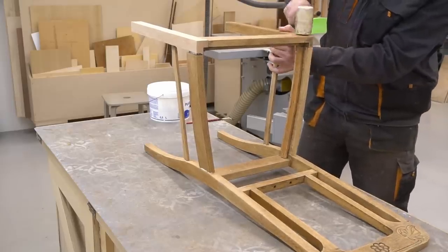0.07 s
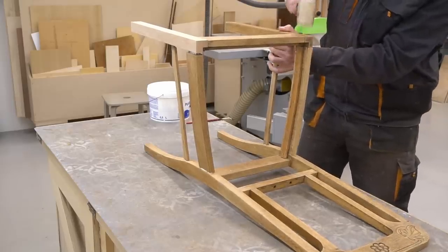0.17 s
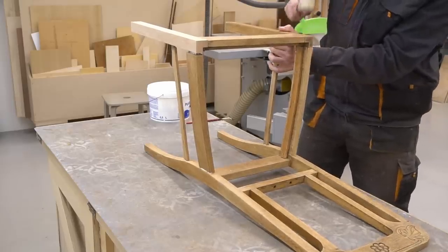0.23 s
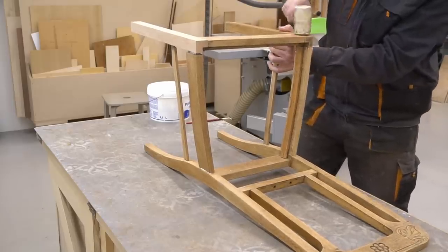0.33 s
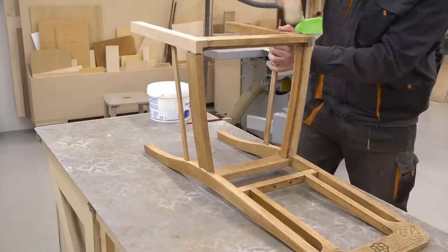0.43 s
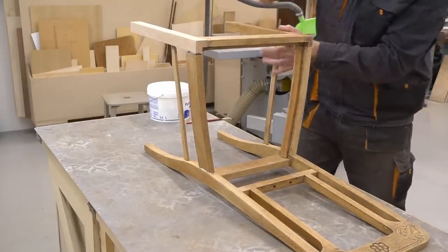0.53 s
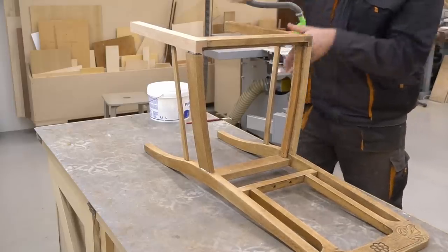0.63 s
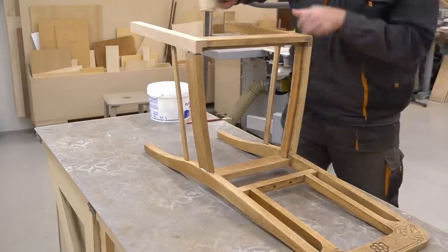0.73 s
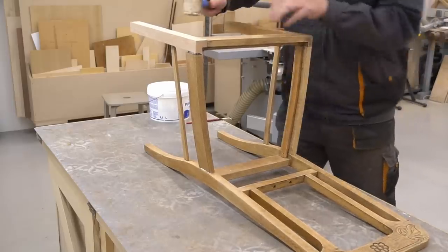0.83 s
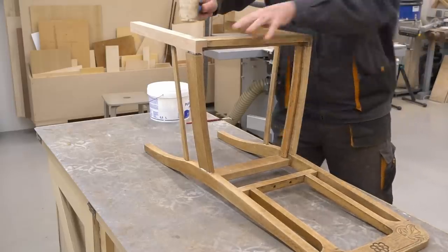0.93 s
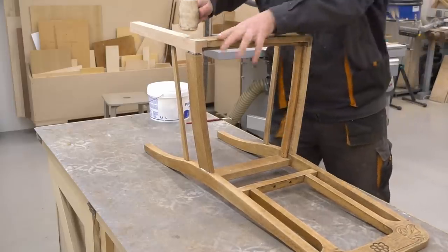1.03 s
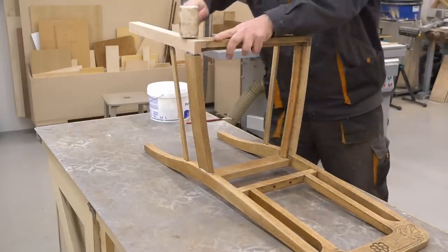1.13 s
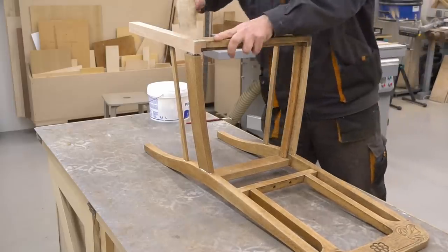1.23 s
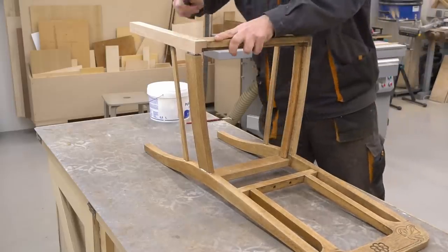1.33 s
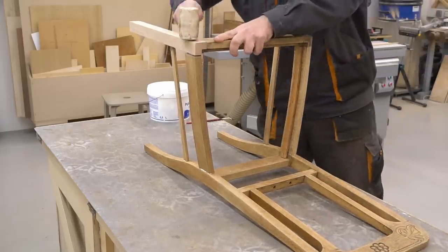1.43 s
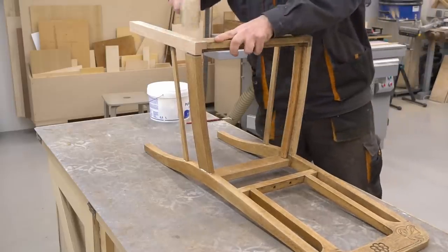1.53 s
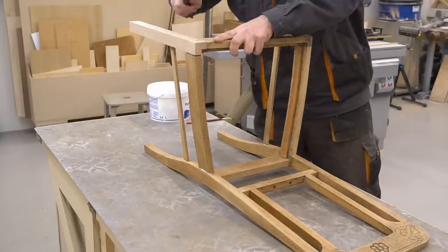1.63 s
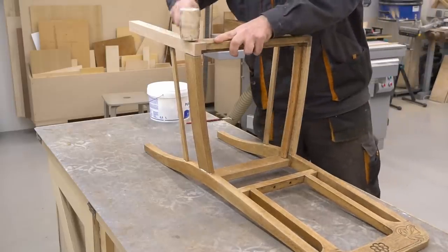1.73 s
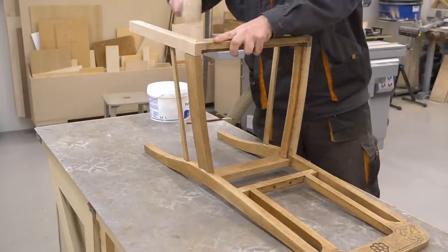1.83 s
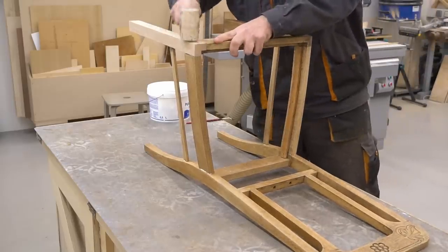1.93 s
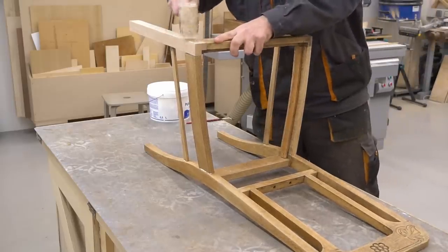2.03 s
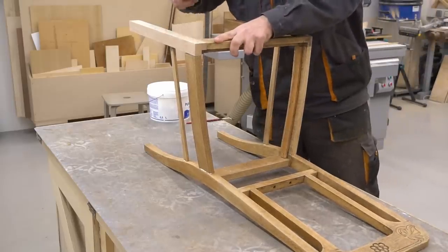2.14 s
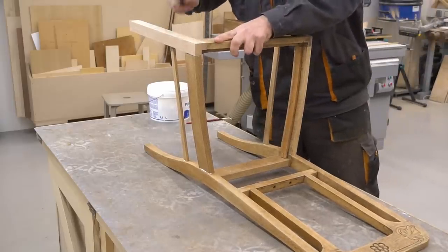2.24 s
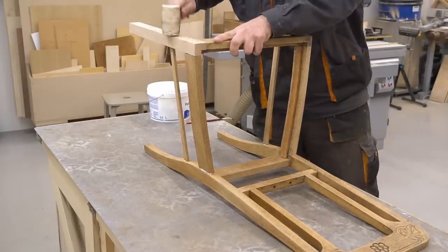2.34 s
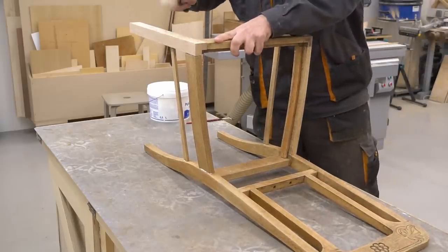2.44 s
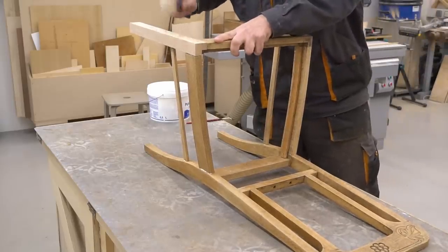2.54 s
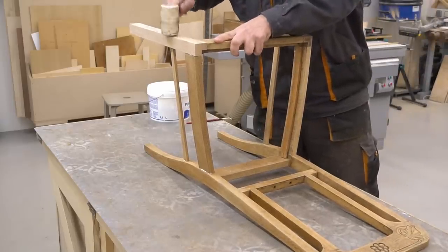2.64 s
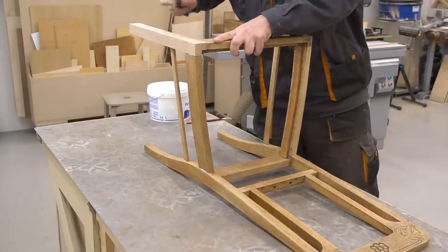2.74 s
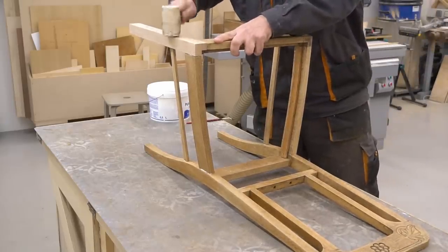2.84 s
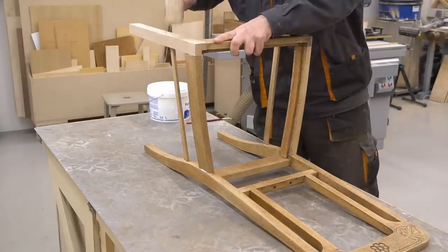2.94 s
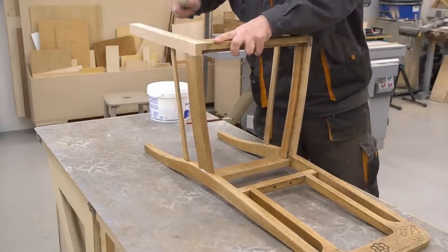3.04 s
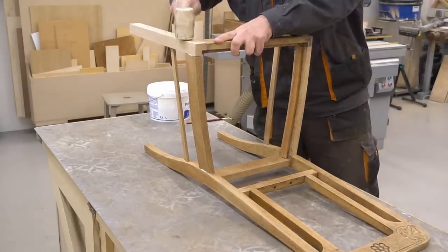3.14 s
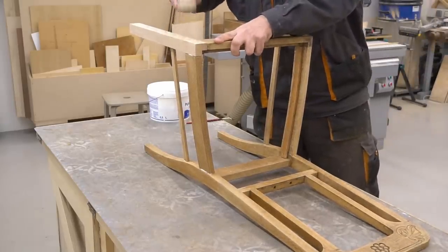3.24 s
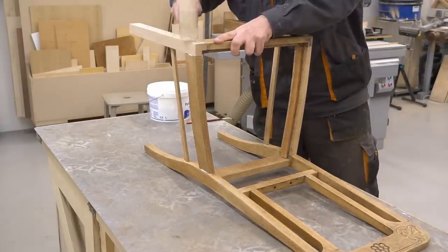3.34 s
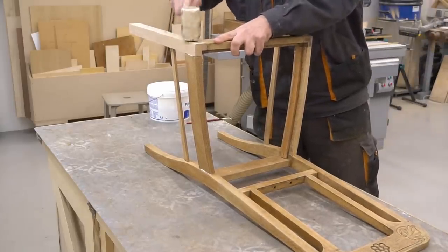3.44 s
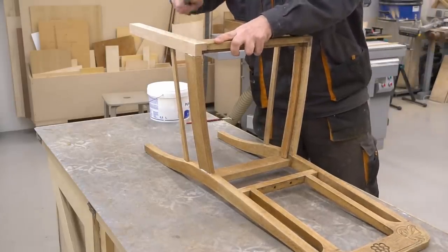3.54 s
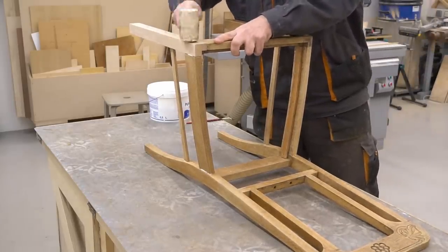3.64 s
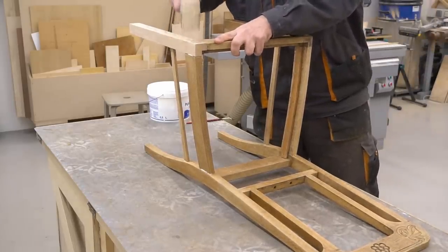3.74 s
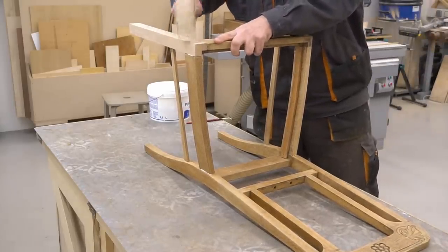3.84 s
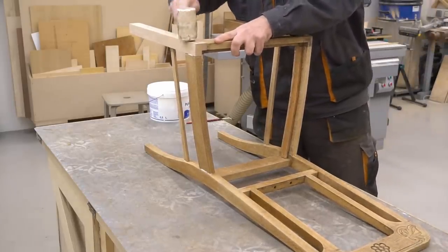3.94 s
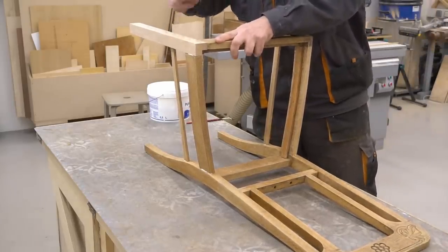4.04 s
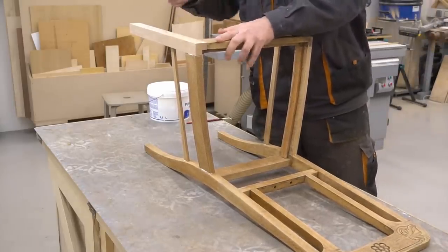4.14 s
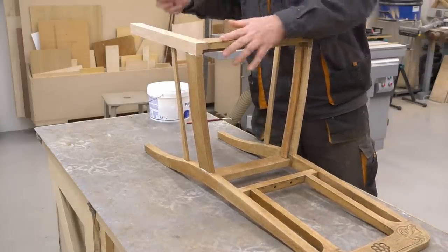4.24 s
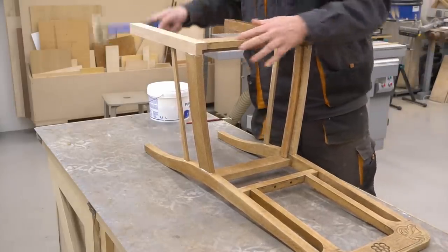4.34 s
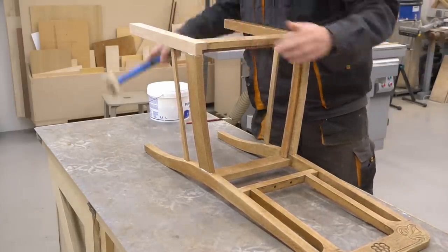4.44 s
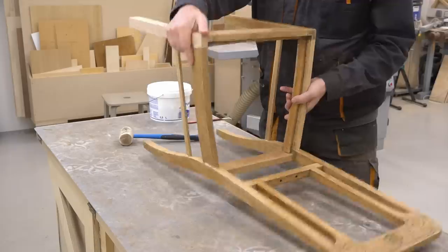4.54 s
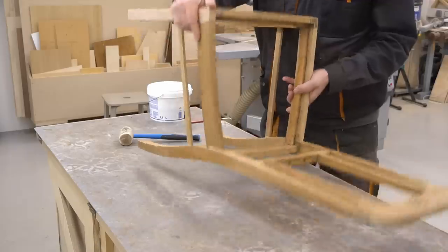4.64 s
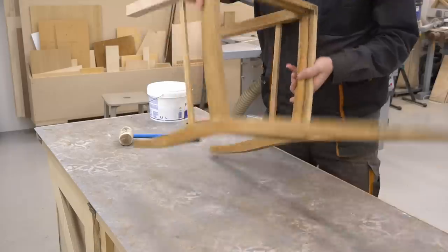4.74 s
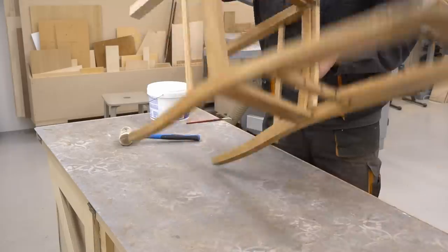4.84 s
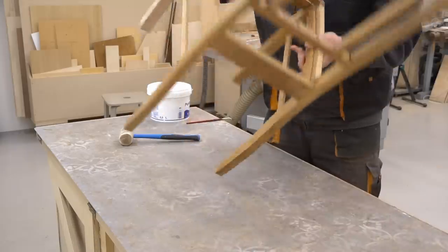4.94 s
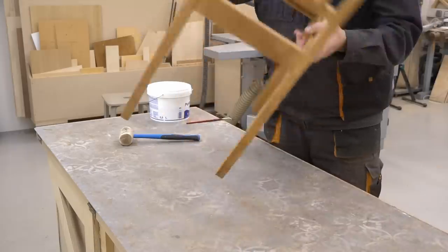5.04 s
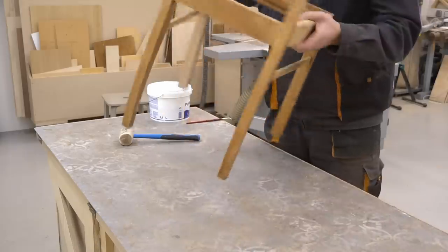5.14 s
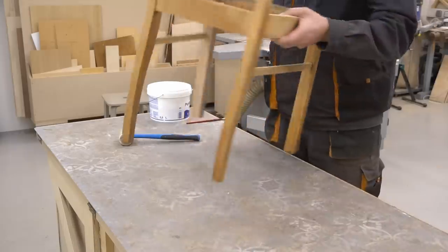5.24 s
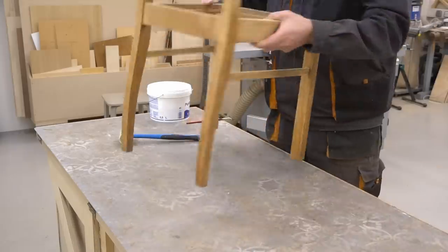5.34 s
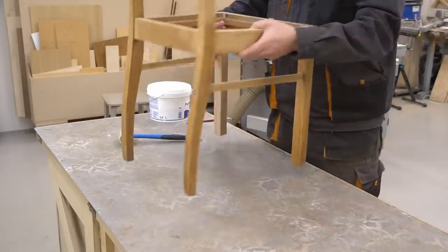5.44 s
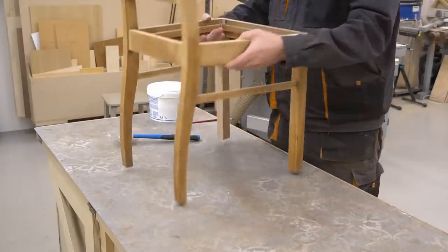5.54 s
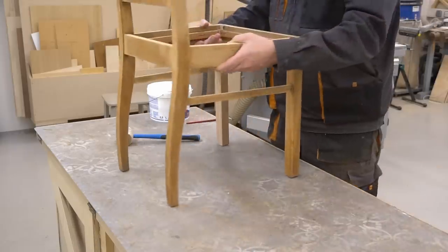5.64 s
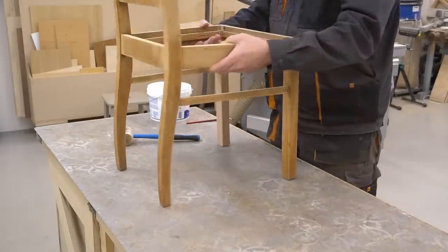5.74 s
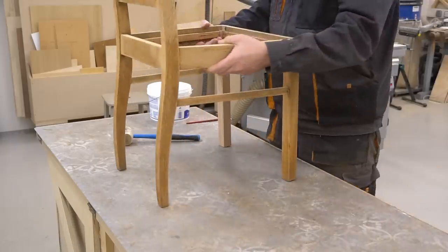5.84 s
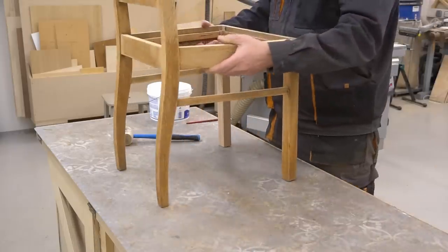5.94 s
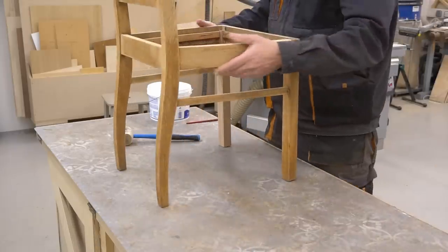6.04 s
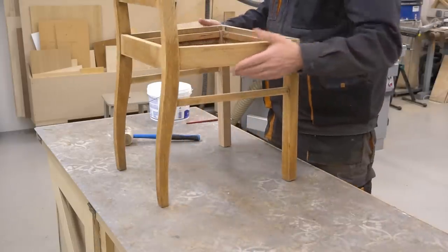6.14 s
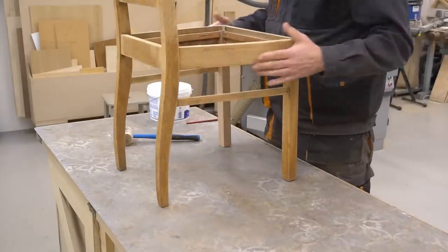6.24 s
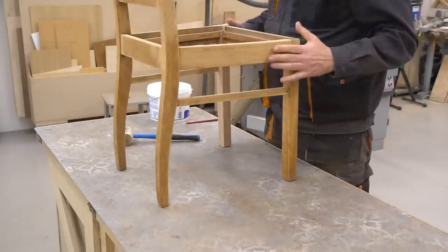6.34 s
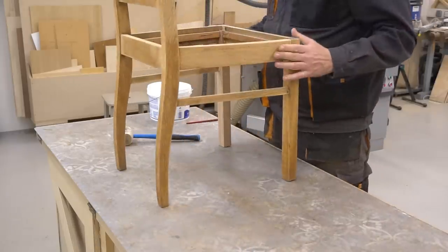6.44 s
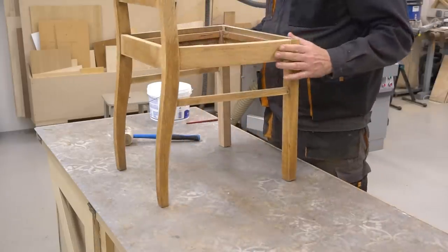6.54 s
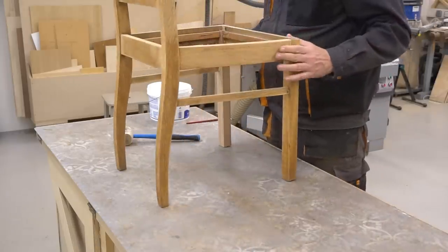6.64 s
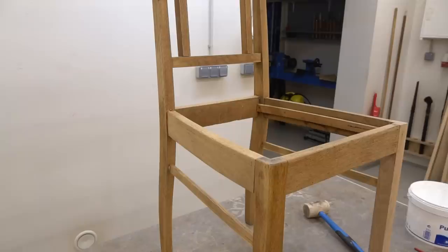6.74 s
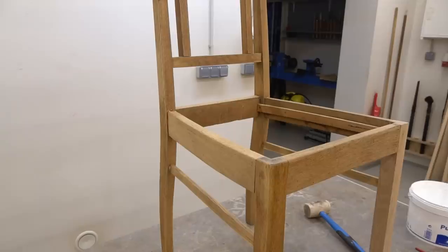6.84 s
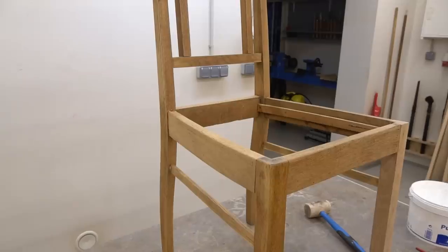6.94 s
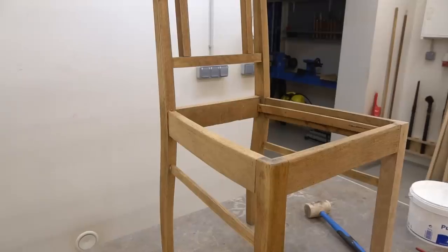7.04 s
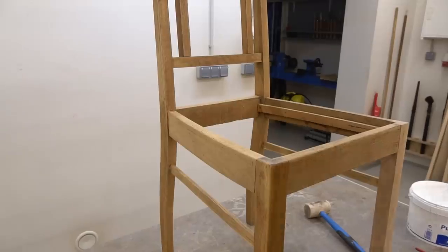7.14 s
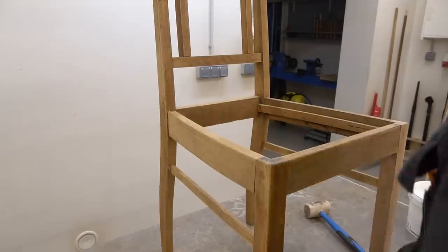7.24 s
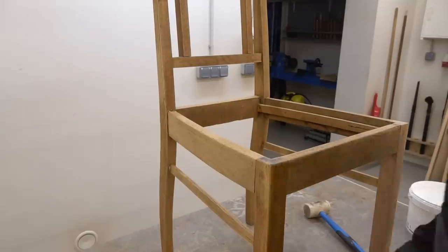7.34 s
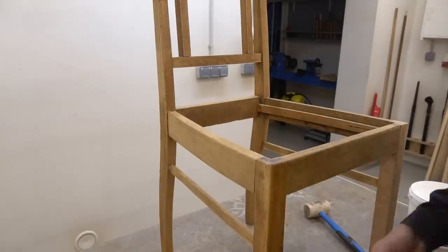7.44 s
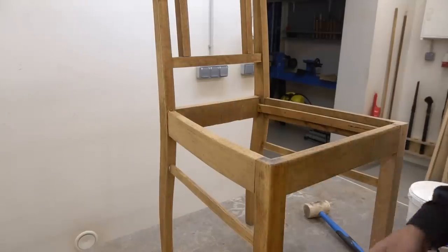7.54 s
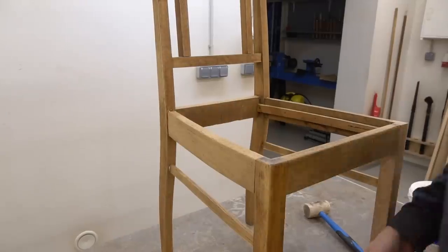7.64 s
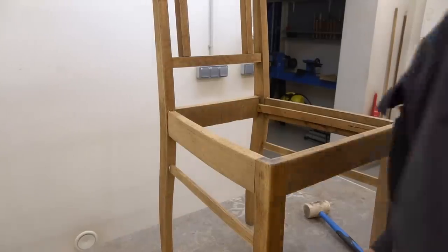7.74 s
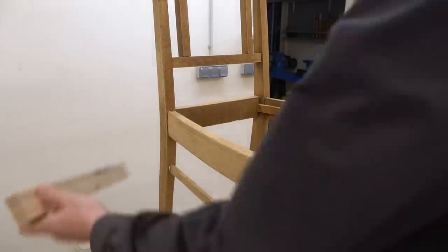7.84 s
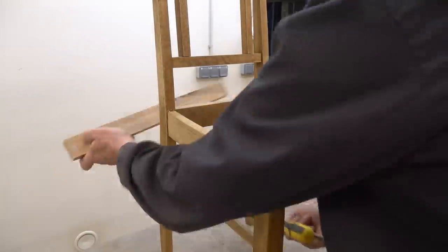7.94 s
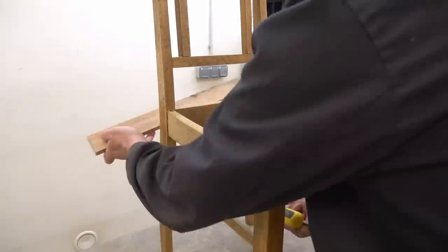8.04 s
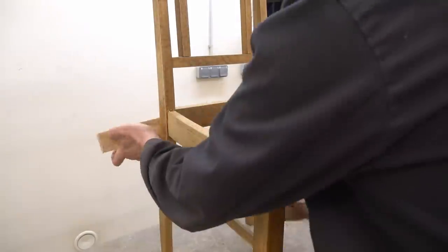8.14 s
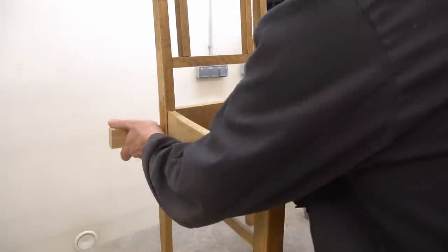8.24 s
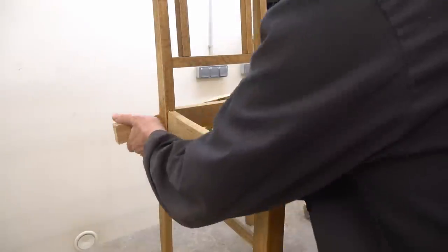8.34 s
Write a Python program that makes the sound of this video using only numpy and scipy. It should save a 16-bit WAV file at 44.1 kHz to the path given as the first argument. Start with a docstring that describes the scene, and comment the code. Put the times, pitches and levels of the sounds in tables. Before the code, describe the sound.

Sharp wood-on-wood blows ring through a chair frame and wash around a hard room: a quick opening burst, a gap with one light touch, then a regular run about four per second, ending full and bright. Afterwards come a soft mallet set-down, quiet handling, clustered leg thuds, a hand rub, cloth rustle, gritty metallic scraping and a closing double wooden clack. Wide stereo, over very quiet room air.

```python
"""A wooden mallet drives home the joints of a chair frame lying on a bench in an echoing workshop.
Each blow is a crack of noise, then ringing chair modes and a wash of room noise in stereo.
The mallet is put down, the chair is stood on its legs and hands slide over the wood: coloured knocks and
swelling noise. Then sleeves rustle, a small metal tool is scraped up (gritty noise through resonances)
and a batten is knocked against the chair, all over the still air of the shop."""
import sys
import numpy as np
from scipy import signal
from scipy.fft import rfft, irfft, next_fast_len
from scipy.io import wavfile
from scipy.ndimage import uniform_filter1d

SR = 44100
rng = np.random.default_rng(int(sys.argv[2]) if len(sys.argv) > 2 else 0)


def transcribe(u):
    """Save the signal u as a 16-bit wav file named by the first command-line argument.

    u: samples, shape (n,) or (channels, n), limited to [-1, 1]; the rate is SR.
    q: integer samples, one column per channel.
    """
    v = np.clip(np.atleast_2d(u).T, -1, 1)
    q = np.round(v * 32767).astype(np.int16)
    wavfile.write(sys.argv[1], SR, q)


N = 369979
RING_SIZE = SR * 4 // 5   # samples that one knock lasts
AGE = np.arange(RING_SIZE) / SR   # seconds since a knock began
TIME = np.arange(N) / SR   # seconds since the scene began

# the workshop's reverberation in each band: pitch_hz, t60_s
ROOM_T60 = [(100, 0.5), (300, 0.57), (1000, 0.59), (2200, 0.55), (4500, 0.51), (10000, 0.39)]
# how alike left and right microphones hear the sound: pitch_hz, likeness (0-1)
LEFT_RIGHT_LIKENESS = [(100, 1), (350, 0.97), (700, 0.82), (1400, 0.59), (2800, 0.45), (5500, 0.19),
                       (9000, 0.42)]
# still workshop: pitch_hz, relative_db
AIR_COLOUR = [(18, -60), (30, -45.5), (93, -16.5), (264, -31), (291, -14), (466, -17.5), (540, -18.5),
              (596, -14), (1490, -2.5), (1680, -9.5), (11000, -23.5), (14300, -62.5), (22000, -120)]

# mallet blows: start_s, level_db, seated (how firmly the joint is seated, 0-1), treble_db
BLOWS = [(-0.1, -29, 0.51, -5.5), (0.107, -29, 0.56, -1.5), (0.3164, -28.5, 0.51, -1.5),
         (1.4595, -28, 0.04, -6), (1.7446, -28, 0.2, -4), (1.9839, -31, 0.54, -1.5),
         (2.321, -30.5, 0.47, -2), (2.6066, -30, 0.49, -3), (2.8544, -31, 0.73, -2.5),
         (3.1262, -29, 0.49, -4.5), (3.392, -29, 0.58, 0), (3.6577, -29.5, 0.92, 7),
         (3.8938, -31.5, 0.99, 6)]
# where bass, low-mid, the neutral middle and treble of a blow lie: pitch_hz
BLOW_COLOUR_HZ = [300, 750, 1600, 3600]
# the dense ringing of frame and bench: pitch_hz, relative_db
FRAME_COLOUR = [(30, -34), (60, -40), (90, -27), (140, -19), (280, -16.5), (400, -8.5), (560, -9.5),
                (850, -3), (1350, -2.5), (2100, -7.5), (4200, -12.5), (7000, -20.5), (11000, -30)]
# the crack of wood on wood: pitch_hz, relative_db
CRACK_COLOUR = [(40, -51.5), (150, -62), (420, -10.5), (800, -7.5), (1200, -4), (2200, -8), (3600, -9),
                (6000, -16), (11000, -27.5)]
# the clearest modes of the chair: pitch_hz, relative_db
FRAME_MODES = [(136, -57.5), (390, -67.5), (420, -53.5), (506, -65), (524, -62.5), (674, -53.5),
               (708, -60.5), (734, -53.5), (878, -54), (902, -47.5), (935, -59), (1003, -54.5),
               (1034, -56.5), (1133, -55.5), (1243, -57), (1333, -47.5), (1374, -56), (1399, -53),
               (1539, -53), (1553, -68), (1683, -55.5), (1949, -53.5)]
# resonances that come out as the joint closes: pitch_hz, width_hz, relative_db
JOINT_MODES = [(409.5, 10, 5), (910, 81, -7), (1368, 67, -0.5)]

# strokes of hands and sleeves: middle_s, level_db, half_length_s, treble_db
STROKES = [(0.964, -77.5, 0.051, -11), (1.085, -78, 0.015, 11), (4.327, -78.5, 0.08, 10),
           (4.8, -66, 0.12, -8), (5.0, -67.5, 0.051, -5), (5.185, -67.5, 0.12, -7.5), (5.5, -76.5, .13, -8),
           (5.956, -49.5, 0.098, -7), (6.19, -64, 0.16, -13.5), (6.428, -59.5, 0.058, 0.5),
           (6.55, -71, 0.091, 12), (6.762, -68, 0.11, 9.5), (6.902, -49.5, 0.014, -4.5),
           (6.968, -60.5, 0.064, -16.5), (7.138, -58, 0.023, 1), (7.237, -61, 0.043, 2),
           (7.333, -45, 0.039, 0), (7.536, -50, 0.03, -3), (7.675, -46.5, 0.018, 2.5),
           (7.767, -61, 0.02, 1), (7.883, -65, 0.071, -4), (7.959, -50.5, 0.012, 2),
           (8.205, -56.5, 0.022, -26), (8.289, -44.5, 0.02, -12.5)]
# skin and cloth on wood: pitch_hz, relative_db
RUB_COLOUR = [(60, -51), (250, -26.5), (600, -11.5), (1500, -2), (3500, 1.5), (7000, -2.5), (11000, -10)]

# the mallet resting lightly on the rail to take aim: start_s, level_db
AIM_TOUCHES = [(1.129, -50)]
# resonances of the rail: pitch_hz, width_hz, relative_db
AIM_MODES = [(143, 7.3, -1), (413, 26, -4.5), (890, 93, -13.5), (1420, 33, -0.5), (1705, 56, 0),
             (4300, 59, -11), (5910, 140, -20.5)]
# the knock of that touch: pitch_hz, relative_db
AIM_COLOUR = [(40, -33), (140, -10.5), (230, -9), (380, 3.5), (560, -27), (1100, -23), (1400, 2.5),
              (1800, 2.5), (2400, -7), (4300, -17.5), (11000, -36)]

# the mallet put down on the bench: start_s, level_db
SET_DOWNS = [(4.506, -46.5)]
# wood laid on the bench: pitch_hz, relative_db
SET_DOWN_COLOUR = [(60, -56), (250, -22.5), (600, -14), (1500, -2), (2400, 4), (3400, -1.5), (6000, -5.5),
                   (11000, -17)]
# fingers and joints ticking as the chair is turned over: start_s, level_db, pitch_hz
TICKS = [(4.815, -66.5, 1800), (4.965, -77, 4000), (5.049, -71, 3000), (5.174, -67.5, 5100)]
# legs landing on the bench: start_s, level_db, treble_db
LEG_LANDINGS = [(5.622, -45.5, 0), (5.647, -46.5, -13), (5.697, -43, -0.5), (5.786, -52, 2),
                (5.804, -56, 12)]
# a leg on the bench: pitch_hz, relative_db
LEG_COLOUR = [(40, -27), (90, -11), (150, -4.5), (280, -6), (430, -8.5), (600, -18), (1600, -14),
              (4000, -19.5), (11000, -34.5)]

# soft bumps of the moving body and its clothes: middle_s, level_db, half_length_s, pitch_hz
BUMPS = [(6.841, -65.5, 0.018, 298), (7.165, -65.5, 0.04, 405), (7.302, -67.5, 0.03, 188),
         (7.706, -75, 0.022, 160), (7.759, -65, 0.014, 119), (8.149, -60, 0.02, 138)]
# bright scrapes as the tool is picked up: middle_s, level_db, half_length_s
SCRAPES = [(7.279, -38, .008), (7.303, -27.5, .0055), (7.345, -47, .012), (7.391, -35, .0035),
           (7.416, -45, .005), (7.445, -51, .008), (7.476, -40, .003), (7.494, -35, .0055),
           (7.535, -49, .013)]
# resonances of the metal tool: pitch_hz, width_hz, relative_db
TOOL_MODES = [(3440, 81, 2), (3720, 25, -3), (3790, 71, 5.5), (5610, 19, 10), (6200, 41, -11),
              (6200, 38, 6), (6900, 53, 2), (8030, 64, 2.5), (8600, 160, -10), (8500, 170, -7),
              (9340, 89, -1), (10130, 210, -7.5)]
# the scraping under those resonances: pitch_hz, relative_db
TOOL_COLOUR = [(100, -45), (300, -33), (700, -21), (1800, -2), (3600, -1), (7500, -1), (11000, -25)]
# the batten meeting the chair: start_s, level_db, bass_db
BATTEN_KNOCKS = [(7.759, -56, -28), (8.12, -46, 11.5), (8.217, -36.5, -18), (8.225, -31, 2),
                 (8.263, -54, 9)]
# resonances of the batten: pitch_hz, width_hz, relative_db
BATTEN_MODES = [(431, 28, -13), (1030, 26, 0), (1550, 20, -5), (1710, 37, -3), (1935, 40, -2),
                (2150, 16, -7), (2760, 64, -13), (2990, 46, -15), (4260, 27, -16), (5220, 53, -26),
                (8350, 89, -35)]
# the knock under those resonances: pitch_hz, relative_db
BATTEN_COLOUR = [(50, -35), (150, -22.5), (400, -13), (700, -6), (1100, -13), (1900, -14), (3000, -4.5),
                 (6000, -25), (11000, -51)]


def from_db(db):
    """Decibels to gain."""
    return 10 ** (np.asarray(db) / 20)


def rms_one(x):
    """Scale to unit power."""
    return x / np.sqrt(np.mean(x ** 2) + 1e-20)


def at_hz(points, size=RING_SIZE):
    """Read a (pitch_hz, value) table at every frequency of a sound of this size."""
    hz, value = np.transpose(points)
    frequencies = np.arange(size // 2 + 1) * SR / size + 0.0013
    return np.interp(np.log(frequencies), np.log(hz), value)


def resonant(modes, size=RING_SIZE):
    """Gain per frequency of resonances, their powers added."""
    f = np.arange(size // 2 + 1) * SR / size + 1e-3
    power = sum(from_db(db) ** 2 / (1 + ((f - hz ** 2 / f) / width) ** 2) for hz, width, db in modes)
    return np.sqrt(power)


def stereo_noise(size=RING_SIZE, spread=0.97):
    """Spectrum of white noise at two microphones, most alike in the bass; more spread is wider."""
    alike = np.clip(1 - spread * (1 - at_hz(LEFT_RIGHT_LIKENESS, size)), -1, 1)
    mid, side = rfft(rng.standard_normal((2, size)))
    return np.sqrt(1 + alike) * mid + np.sqrt(1 - alike) * side * [[1], [-1]]


def steady(colour, spread, modes=(), ring_db=0):
    """Unbroken stereo noise of a given colour, resonances and width, at unit power."""
    size = 2 * next_fast_len(N // 2 + 1, real=True)
    gain = from_db(at_hz(colour, size)) + from_db(ring_db) * resonant(modes, size)
    return rms_one(irfft(stereo_noise(size, spread) * gain)[:, :N])


def swell(middle_s, half_length_s):
    """A smooth bell-shaped rise and fall around a moment."""
    return np.exp(-.5 * np.minimum(((TIME - middle_s) / half_length_s) ** 2, 100))


def grit(depth_db, size):
    """A level that flickers at random, smoothed over this many samples."""
    return from_db(depth_db * rms_one(uniform_filter1d(rng.standard_normal(N), size=size)))


def add(out, start_s, sound):
    """Mix a sound in at a time; what lies before the opening is left out."""
    start = round(start_s * SR)
    first, last = max(start, 0), min(start + sound.shape[1], N)
    out[:, first:last] += sound[:, first - start:last - start]


def dying(t60, hold):
    """Reflections keep the level up for a moment before it falls."""
    return from_db(-60 * (np.sqrt(AGE ** 2 + hold ** 2) - hold) / t60)


def lingering(power, t60):
    """The power that stays in the air after a sound, dying away."""
    keep = from_db(-60 / (t60 * SR)) ** 2
    return signal.lfilter([1 - keep], [1, -keep], power)


def reverberant(spectrum, hold, rise):
    """A coloured noise that fills the room, each band dying at its own pace."""
    spectrum = spectrum / np.std(irfft(spectrum))
    out = 0
    for hz, t60 in ROOM_T60:
        band = at_hz([(other, other == hz) for other, _ in ROOM_T60])
        out = out + irfft(spectrum * band) * dying(t60, hold)
    return out * (1 - np.exp(-(AGE / rise) ** 2))


def burst(spectrum, length, rise=0.00056):
    """The direct sound of a contact: a few milliseconds of chatter that end quickly."""
    chatter = rms_one(irfft(spectrum))
    return chatter * (1 - np.exp(-AGE / rise)) / (1 + (AGE / length) ** 6)


def knock(gain, direct_db, length, hold):
    """A light contact: narrow direct sound and its wide wash in the room."""
    direct = burst(stereo_noise(spread=0.53) * gain, length, rise=0.00048)
    return from_db(direct_db) * direct + reverberant(stereo_noise() * gain, hold, rise=0.01)


def still_air(level_db=-74.5):
    """The quiet of the workshop: steady coloured noise."""
    return from_db(level_db) * steady(AIR_COLOUR, spread=1.0)


def frame_modes(colour, build_cycles=5.2, t60=0.42, hold=.06):
    """The clearest modes of the chair as sines; low ones take longer to build up."""
    out = np.zeros((2, RING_SIZE))
    for hz, db in FRAME_MODES:
        # each blow wakes a mode a little differently
        strength_db, detune_hz, turn, apart = rng.normal(0, [1.5, 1.5, 1, 1])
        tint_db = np.interp(np.log(hz), np.log(BLOW_COLOUR_HZ), colour)
        # left and right drift further out of phase up to 3500 Hz
        left_right = apart * min(hz / 3500, 1) * np.array([[1], [-1]])
        phase = 2 * np.pi * ((hz + detune_hz) * AGE + turn) + left_right
        build = 1 - np.exp(-np.minimum(AGE * hz / build_cycles, 10) ** 2)
        out += from_db(db + tint_db + strength_db) * np.sin(phase.astype(np.float32)) * build
    return out * dying(t60, hold)


def mallet(modes_db=38.0, wash_db=-1.04, crack_db=6.0, crack_s=0.0095, joint_db=9.0, shared=0.55):
    """Each blow cracks, then frame and room ring; a closing joint brings out bass and its own resonances."""
    slip_loss_db, slip_ends = 12.5, .15   # a slipping joint swallows the crack; seating at which it grips
    out = np.zeros((2, N))
    usual_crack, usual_wash = stereo_noise(spread=0.43), stereo_noise()
    kept, new = np.sqrt([shared, 1 - shared])   # the blows land near one spot and so sound related
    frame = from_db(at_hz(FRAME_COLOUR))
    for start_s, level_db, seated, treble_db in BLOWS:
        # a blow sounds deeper as the joint goes from loose (0) to seated (1)
        bass_db = np.interp(seated, [0, 1], [-10, 12])
        low_mid_db = np.interp(seated, [0, 1], [-6.5, 7])
        colour = [bass_db, low_mid_db, 0, treble_db]
        tint = from_db(at_hz(list(zip(BLOW_COLOUR_HZ, colour))))
        # the colour leaves the loudness alone
        even = np.linalg.norm(frame) / np.linalg.norm(frame * tint)
        tint = tint * np.hypot(1, seated * from_db(joint_db) * resonant(JOINT_MODES))

        crack_noise = kept * usual_crack + new * stereo_noise(spread=0.46)
        crack = burst(crack_noise * from_db(at_hz(CRACK_COLOUR)) * tint, crack_s)
        slip_db = slip_loss_db * np.exp(-seated / slip_ends)

        # the walls answer a moment after the crack has ended
        wash_noise = kept * usual_wash + new * stereo_noise()
        wash = reverberant(wash_noise * frame * tint, hold=0.12, rise=0.016)
        ringing = from_db(wash_db) * wash + even * from_db(modes_db) * frame_modes(colour)
        add(out, start_s, from_db(level_db) * (from_db(crack_db - slip_db) * crack + ringing))
    return out


def rubbing(dull_grain_db=0.5, bright_grain_db=3.1, split_hz=1500, room_db=-0.5, t60=0.38):
    """Skin and cloth catch and slip on the wood; every stroke swells, fades and lingers in the room."""
    hiss = steady(RUB_COLOUR, spread=1.39)
    dull = signal.sosfilt(signal.butter(1, split_hz, fs=SR, output="sos"), hiss)
    bright = hiss - dull
    strokes = [(from_db(level_db) * swell(middle_s, half_length_s), treble_db)
               for middle_s, level_db, half_length_s, treble_db in STROKES]
    out = 0
    # half of each stroke's treble_db lowers the dull part, half raises the bright part
    for noise, tilt, grain_db in ((dull, -.5, dull_grain_db), (bright, .5, bright_grain_db)):
        power = sum((level * from_db(tilt * treble_db)) ** 2 for level, treble_db in strokes)
        tail = from_db(room_db) * np.sqrt(lingering(power, t60))
        out = out + noise * np.hypot(np.sqrt(power) * grit(grain_db, size=200), tail)
    return out


def aim(ring_db=10.0):
    """A gentle touch of the mallet wakes only a few resonances of the rail."""
    out = np.zeros((2, N))
    body = from_db(at_hz(AIM_COLOUR)) + from_db(ring_db) * resonant(AIM_MODES)
    for start_s, level_db in AIM_TOUCHES:
        add(out, start_s, from_db(level_db) * knock(body, direct_db=9.5, length=0.009, hold=0.072))
    return out


def set_down():
    """The mallet is laid on the bench: one coloured knock and its room wash."""
    out = np.zeros((2, N))
    gain = from_db(at_hz(SET_DOWN_COLOUR))
    for start_s, level_db in SET_DOWNS:
        add(out, start_s, from_db(level_db) * knock(gain, direct_db=1.0, length=0.018, hold=0.075))
    return out


def ticks():
    """Fingers and joints tick as the chair is turned: each a knock through one broad resonance."""
    out = np.zeros((2, N))
    for start_s, level_db, hz in TICKS:
        gain = resonant([(hz, hz / 2, 0)])
        add(out, start_s, from_db(level_db) * knock(gain, direct_db=2.0, length=0.0086, hold=.01))
    return out


def legs():
    """The legs land on the bench one after another, each with its own treble."""
    out = np.zeros((2, N))
    for start_s, level_db, treble_db in LEG_LANDINGS:
        gain = from_db(at_hz(LEG_COLOUR) + at_hz([(400, 0), (1400, treble_db)]))
        add(out, start_s, from_db(level_db) * knock(gain, direct_db=3.0, length=0.014, hold=0.021))
    return out


def bumps():
    """The moving body and its clothes bump softly: swells of band-passed noise, the same left and right."""
    out = np.zeros(N)
    for middle_s, level_db, half_length_s, hz in BUMPS:
        band = signal.butter(2, [hz / 1.23, hz * 1.78], "band", fs=SR, output="sos")
        thud = rms_one(signal.sosfilt(band, rng.standard_normal(N)))
        out += from_db(level_db) * swell(middle_s, half_length_s) * thud
    return out


def tool(room_db=1.5, grain_db=2.0, ring_t60=0.14):
    """Short, gritty scrapes make a metal tool ring, and linger briefly in the room."""
    shaking = sum(from_db(level_db) * swell(middle_s, half_length_s)
                  for middle_s, level_db, half_length_s in SCRAPES)
    tail = np.sqrt(lingering(shaking ** 2, ring_t60))
    grain = rms_one(grit(grain_db, size=40))
    metal = steady(TOOL_COLOUR, spread=0.99, modes=TOOL_MODES, ring_db=7)
    return metal * np.hypot(shaking * grain, from_db(room_db) * tail)


def batten(ring_db=25, damped_t60=0.54):
    """The batten clacks on the chair, its resonances ringing until the hand damps them."""
    out = np.zeros((2, N))
    body = from_db(at_hz(BATTEN_COLOUR)) + from_db(ring_db) * resonant(BATTEN_MODES)
    damping = from_db(-60 * AGE / damped_t60)
    for start_s, level_db, bass_db in BATTEN_KNOCKS:
        gain = body * from_db(at_hz([(250, bass_db), (1000, 0)]))
        clack = knock(gain, direct_db=-0.5, length=0.026, hold=0.01)
        add(out, start_s, from_db(level_db) * clack * damping)
    return out


def scene():
    """All the work over the still air of the shop."""
    chair_work = mallet() + rubbing() + aim() + set_down() + ticks() + legs()
    return still_air() + chair_work + bumps() + tool() + batten()


def record(dry, ceiling=0.14, low_cut_hz=40, top_cut_hz=11200):
    """The deep bass is thinned, the highest peaks are rounded and the top is cut."""
    low_cut = signal.butter(2, low_cut_hz, "high", fs=SR, output="sos")
    thinned = signal.sosfilt(low_cut, dry)
    rounded = ceiling * np.tanh(thinned / ceiling)
    top_cut = signal.ellip(12, .2, 75, top_cut_hz, fs=SR, output="sos")
    return signal.sosfilt(top_cut, rounded)


dry = scene()
out = record(dry)
transcribe(out)
```